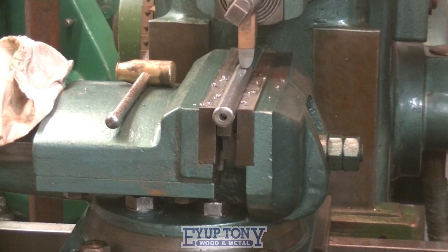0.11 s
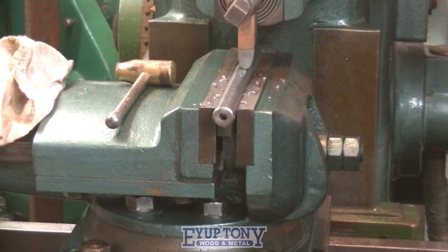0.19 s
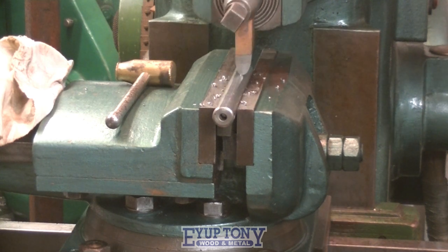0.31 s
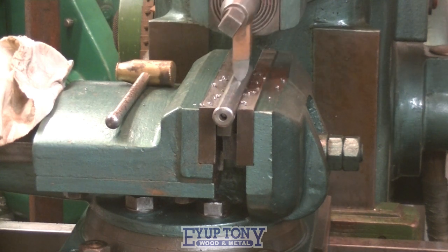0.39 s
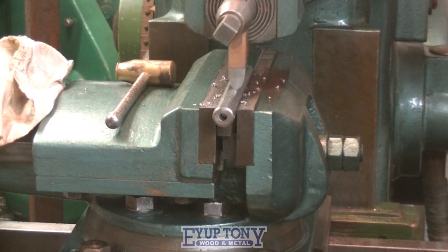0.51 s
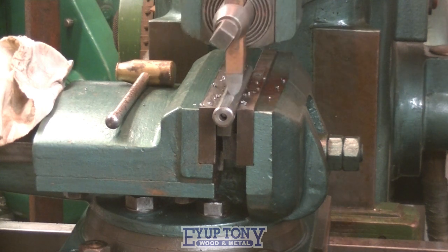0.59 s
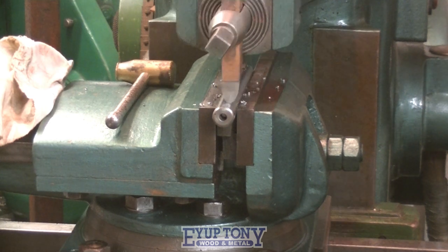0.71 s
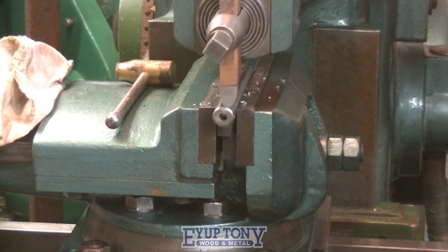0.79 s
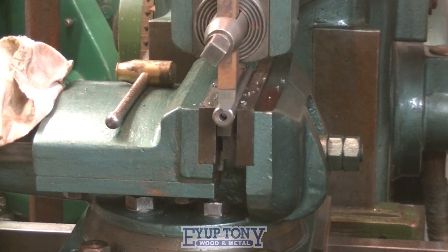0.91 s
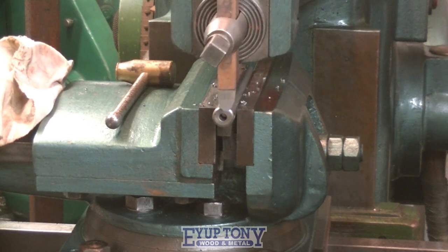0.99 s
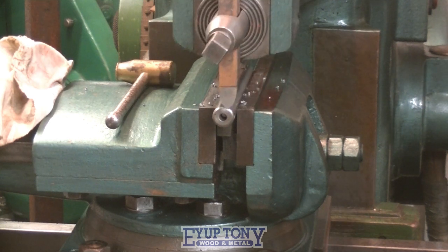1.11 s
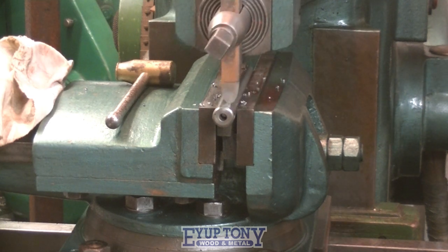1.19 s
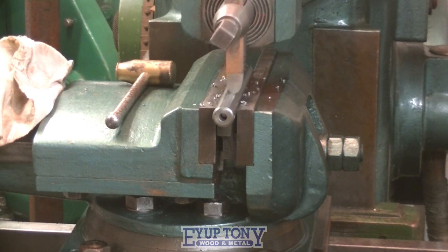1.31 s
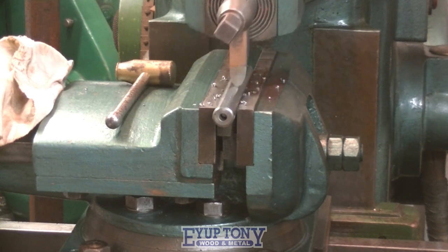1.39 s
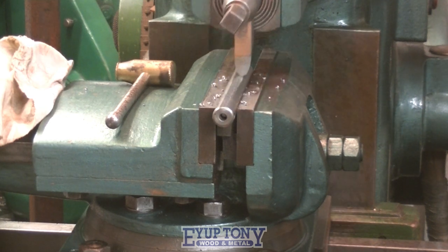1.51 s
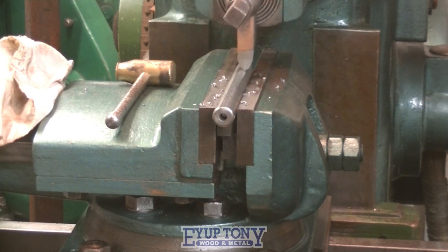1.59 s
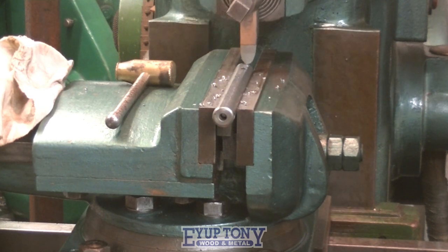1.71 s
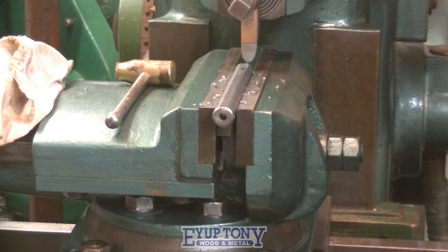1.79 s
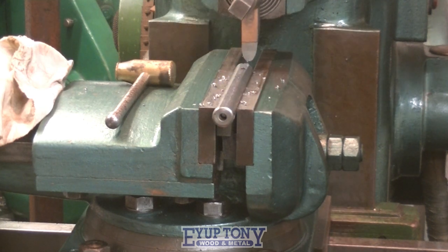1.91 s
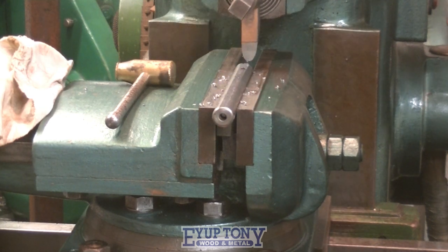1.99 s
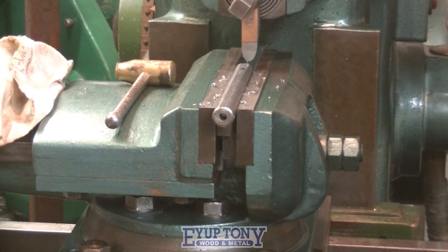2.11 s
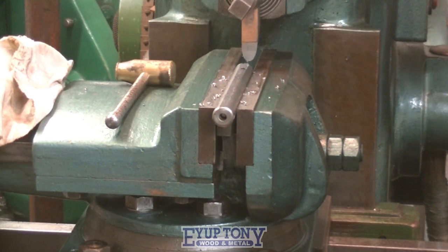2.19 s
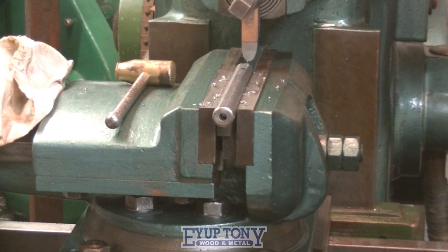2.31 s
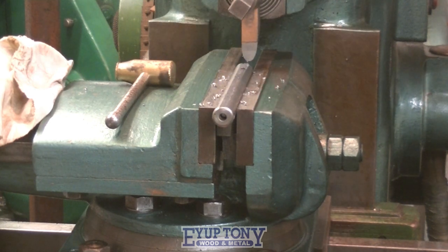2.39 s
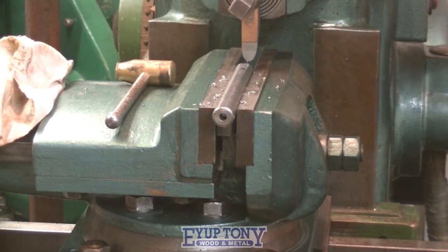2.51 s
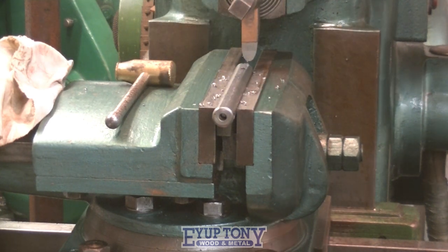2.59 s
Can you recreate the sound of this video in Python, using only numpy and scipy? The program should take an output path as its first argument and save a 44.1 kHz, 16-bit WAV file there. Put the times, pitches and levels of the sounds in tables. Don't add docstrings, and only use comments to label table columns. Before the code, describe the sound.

A metal shaper in a workshop: low motor and gear noise, then a rough ringing metal slide out and back, a sharp bright snap midway, and small linkage knocks as it stops; close stereo microphone.

```python
import sys
import numpy as np
from scipy import signal
from scipy.fft import rfft, irfft
from scipy.io import wavfile
from scipy.ndimage import uniform_filter1d

SR = 44100
rng = np.random.default_rng(int(sys.argv[2]) if len(sys.argv) > 2 else 0)


def linear_from_db(decibels):
    return 10 ** (np.asarray(decibels, float) / 20)


def dump_mix(stems):
    frames = np.atleast_2d(stems).T
    limited = np.clip(frames, -1, 1)
    pcm = np.round(limited * 32767).astype(np.int16)
    wavfile.write(sys.argv[1], SR, pcm)


N = 116865
T = np.arange(N) / SR

# (multiple of HUM_HZ, level [dB])
HUM_PARTIALS = [(1, -89), (4, -76), (5, -68), (6, -70), (7, -72), (8, -73), (9, -61), (10, -74), (11, -71)]
# (time [s], level [dB])
MOTOR_LOAD = [(0, 0), (.2, 0), (1, -3), (2.1, 2), (2.3, 1.5), (2.45, -2.5), (2.65, -11.5)]
HUM_HZ, SLOT_MULTIPLE = 99.6, 9
HUM_WAVER_DB, HUM_WANDER_CYCLES = 1.0, 0.02
LOAD_SHARE = 0.22

# (frequency [Hz], density [dB per Hz])
IDLE_COLOUR = [(15, -79), (25, -55), (221, -13.5), (495, -0.5), (741, -8), (895, -3.5), (2560, -8.5),
               (12200, -40), (15500, -80)]
# (frequency [Hz], width [Hz], level [dB])
GEAR_MODES = [(387, 30, -70), (1120, 120, -66), (2575, 110, -68), (2970, 70, -75), (4050, 90, -80),
              (4414, 70, -80), (4250, 400, -79)]
IDLE_DB, GEAR_SWAY_DB = -58.5, 1.0

# (time [s], level [dB])
TOOL_DRAG = [(0, -64), (.03, -100), (.25, -100), (.28, -72.5), (.62, -76.5), (.7, -100), (1.33, -100),
             (1.38, -70.5), (1.6, -73), (1.703, -75), (1.712, -59), (1.728, -64), (1.74, -71), (1.762, -63),
             (1.79, -74), (1.83, -100)]
# (frequency [Hz], width [Hz], level [dB])
SHANK_MODES = [(7030, 60, 0), (7220, 60, -1), (7360, 90, -9)]
# (frequency [Hz], density [dB per Hz])
CHIP_COLOUR = [(2500, -15), (4500, 7), (8400, -1), (10500, -19), (12500, -5), (14500, -11), (15500, -30)]
# (start [s], length [s], level [dB])
CHIPS = [
    (.31, 0.05, -80),
    (0.48, 0.04, -74),
    (.58, .05, -73.5),
    (1.6, .06, -78),
    (1.708, 0.022, -66),
    (1.728, 0.048, -64),
]
CHATTER_DB, CHIP_RISE_S, CHIP_FALL_S = 3.0, 0.008, 0.02

# (time [s], level [dB], brightness [dB])
RAM_EFFORT = [(.21, -54.5, -30), (0.249, -44.5, -11), (0.291, -38.5, -5), (.34, -41.5, -5), (.6, -42.5, -4),
              (.82, -43, -8), (.88, -41, -6.5), (1.01, -45.5, -7.5), (1.15, -43, -6), (1.4, -40.5, -4.5),
              (1.74, -42, -4.5), (1.8, -41.5, -4), (1.87, -43.5, -4.5), (1.92, -45, -6.5), (1.98, -45, -9),
              (2.03, -53.5, -14), (2.09, -61, -5)]
# (frequency [Hz], density [dB per Hz])
CASTING_COLOUR = [(60, -79), (200, -43.5), (330, -8.5), (1270, -2.5), (2650, -14.5), (4500, -29),
                  (8000, -37), (15000, -77)]
# (frequency [Hz], width [Hz], level [dB])
STROKE_MODES = [(350, 14, -8), (388, 34, 2.5), (598, 20, -6), (647, 14, -3), (687, 16, 0), (760, 22, 1),
                (807, 16, 0), (939, 35, 0), (1089, 25, -3), (1180, 18, -2), (1292, 16, -2), (1412, 18, -5),
                (1720, 25, -6), (1930, 35, -6),
                (142, 32, -24), (486, 32, -21), (897.5, 29, -1), (1023, 16, -2), (1233, 14, -3),
              (1480, 40, -10), (1643.5, 21, -5), (1822, 67, -0.5), (2150, 66, -10), (2554, 26, -10),
              (2814, 19, -33)]
SLIPS_PER_S, SLIP_SPREAD_DB = 4000, 2.5
MODES_DB, RAM_ROOM_DB = -0.5, -3.0
SPLIT_HZ, BRIGHT_DB = 1500, 3.5

# (frequency [Hz], density [dB per Hz])
SNAP_COLOUR = [(880, -23), (1500, -27), (2270, 2.5), (4550, -3), (5490, -4), (8400, -2), (10500, -17),
               (13100, -11), (15800, -22), (16500, -60)]
# (frequency [Hz], T60 [s])
SNAP_T60 = [(2000, 0.29), (5000, 0.28), (8000, .21), (14000, .17)]
# (frequency [Hz], lead of left [rad])
SNAP_PHASE = [(3500, 0), (5200, .6), (6500, -1.2), (7400, -.1), (9000, -1.6), (9800, 4), (16000, 5.5)]
SNAP_S, SNAP_DB, THUD_DB, RAGGED_DB = 1.1928, -50.5, -71, 0.8
HOLD_S, HOLD_LIFT = 0.006, 1.3
CRACK_DB, CRACK_S, CRACK_HZ = -27, 0.00022, 8000

# (time [s], level [dB], centre [Hz],
# length [s], reach [octaves])
KNOCKS = [(1.774, -43, 1100, 0.04, 0.94), (1.796, -47.5, 420, 0.031, 0.24),
          (1.816, -52.5, 3600, 0.049, 0.54), (1.825, -74, 7900, .022, .06), (1.854, -63, 4130, 0.028, 0.46),
          (1.885, -42.5, 850, 0.024, 0.66), (1.945, -49.5, 940, 0.053, 0.67), (2.03, -58, 493, 0.054, 0.37),
          (2.099, -60, 2750, .014, .2), (2.11, -59, 1750, 0.063, .4), (2.139, -62, 417, 0.028, 0.31),
          (2.158, -64, 2580, 0.044, 0.078), (2.223, -60, 2580, 0.022, .15), (2.292, -69, 2550, 0.039, .1),
          (2.346, -61, 2560, 0.01, .12), (2.368, -60.5, 2660, .016, .2), (2.39, -64, 2500, .012, .15)]
# (frequency [Hz], level [dB], T60 [s])
LINKAGE_MODES = [(404, 0, .08), (700, 0, .08), (894, 0, .07), (1180, -3, .05), (1660, 0, .06),
                 (2210, -5, .05), (2590, 0, .06), (2960, -3, .06), (3550, -9, .03), (4200, -3, .03),
                 (4590, -4, .03), (5050, -6, .02), (7960, -10, .04)]
BELL_DB, RATTLE_DB = -12, 5

# (frequency [Hz], T60 [s])
ROOM_T60 = [(300, .45), (1500, .4), (6000, .25), (14000, .12)]
ROOM_DB = -10
# (frequency [Hz], left-right likeness [0-1])
LIKENESS = [(60, 0.12), (180, 0.89), (550, 1), (1650, 0.94), (4970, 0.62), (15000, 0.087)]
# (frequency [Hz], left minus right [dB])
LEAN = [(60, 1.5), (180, 1), (550, 4), (1650, 2.0), (4970, 0.5), (15000, 3)]
# (frequency [Hz], density [dB per Hz])
HISS_COLOUR = [(25, 10), (80, 2), (300, -7), (8000, 2), (12500, -22), (13500, -34)]
HISS_DB = -84


def evened(x):
    return x / np.sqrt(np.mean(x ** 2) + 1e-20)


def read(points, hz):
    f, value = np.transpose(points)
    return np.interp(np.log(hz + 1), np.log(f + 1), value)


def curve(points):
    return np.interp(T, *np.transpose(points))


def colour(x, points):
    n = x.shape[-1]
    return irfft(rfft(x) * linear_from_db(read(points, np.fft.rfftfreq(n, 1 / SR))), n)


def noise():
    return rng.standard_normal(N)


def resonate(x, hz, width_hz):
    r = np.exp(-np.pi * width_hz / SR)
    poles = [1, -2 * r * np.cos(2 * np.pi * hz / SR), r * r]
    return evened(signal.lfilter([1, 0, -1], poles, x))


def drift(seconds):
    n = max(int(seconds * SR), 1)
    return evened(uniform_filter1d(uniform_filter1d(noise(), n), n))


def spread(a, b, likeness):
    c = np.clip(read(likeness, np.fft.rfftfreq(N, 1 / SR)), 0, 1)
    right = irfft(c * rfft(a) + np.sqrt(1 - c ** 2) * rfft(b), N)
    return np.array([a, right])


def dying_noise(length_s, t60s):
    white = rng.standard_normal((2, int(length_s * SR)))
    hz, t, z = signal.stft(white, SR, nperseg=128)
    t60 = np.maximum(read(t60s, hz), 0.01)[:, None]
    return signal.istft(z * linear_from_db(-60 * t / t60), SR, nperseg=128)[1]


def room(x):
    tail = dying_noise(0.71, ROOM_T60)
    wet = signal.fftconvolve(x[None], tail / np.linalg.norm(tail[0]), axes=1)[:, :N]
    return linear_from_db(ROOM_DB) * spread(*wet, LIKENESS)


def motor():
    hum = np.zeros(N)
    for multiple, db in HUM_PARTIALS:
        share = 1 if multiple == SLOT_MULTIPLE else LOAD_SHARE
        level_db = db + share * curve(MOTOR_LOAD) + HUM_WAVER_DB * drift(0.044)
        cycles = multiple * HUM_HZ * T + rng.random() + HUM_WANDER_CYCLES * drift(0.046)
        hum += np.sqrt(2) * linear_from_db(level_db) * np.sin(2 * np.pi * cycles)
    return hum


def idle():
    ports = []
    for _ in range(2):
        port = linear_from_db(IDLE_DB) * evened(colour(noise(), IDLE_COLOUR))
        for hz, width_hz, db in GEAR_MODES:
            port += linear_from_db(db + GEAR_SWAY_DB * drift(0.031)) * resonate(noise(), hz, width_hz)
        ports.append(port)
    sway_db = LOAD_SHARE * curve(MOTOR_LOAD) + 0.61 * drift(0.024)
    return linear_from_db(sway_db) * spread(*ports, LIKENESS)


def tool():
    chatter = linear_from_db(CHATTER_DB * drift(0.0039)) * rng.standard_normal((2, N))
    squeals = []
    for c in chatter:
        rings = sum(linear_from_db(db) * resonate(c, hz, width_hz) for hz, width_hz, db in SHANK_MODES)
        squeals.append(evened(colour(rings, [(6000, -24), (6800, 5), (7500, 7), (8500, -26)])))
    squeal = linear_from_db(curve(TOOL_DRAG)) * spread(*squeals, [(5000, 0.94), (14000, 1.0)])

    scrape = np.zeros(N)
    for start_s, length_s, db in CHIPS:
        rise = np.clip((T - start_s) / CHIP_RISE_S, 0, 1)
        fall = np.exp(-np.maximum(T - start_s - length_s, 0) / CHIP_FALL_S)
        scrape += linear_from_db(db) * rise * fall
    fizz = [evened(colour(linear_from_db(0.7 * drift(0.003)) * noise(), CHIP_COLOUR)) for _ in range(2)]
    return squeal + scrape * spread(*fizz, [(5000, 0.54), (14000, 0.59)])


def ram():
    s, db, bright_db = np.transpose(RAM_EFFORT)
    effort = linear_from_db(np.interp(T, [0.18, *s, 2.3], [-90, *db, -90]) + 1.03 * drift(0.011))
    ports = []
    for _ in range(2):
        slips = (rng.random(N) < SLIPS_PER_S / SR) * rng.choice([-1, 1], N)
        slips = slips * linear_from_db(SLIP_SPREAD_DB * np.minimum(rng.exponential(1, N), 2))
        drive = effort * (evened(slips) + 0.83 * noise())
        modes = STROKE_MODES
        rings = sum(linear_from_db(d) * resonate(drive, hz, width_hz) for hz, width_hz, d in modes)
        rings = evened(colour(rings, [(100, -40), (150, -6), (3000, 3), (6000, -25)]))
        both = evened(colour(drive, CASTING_COLOUR)) + linear_from_db(MODES_DB) * rings
        low = colour(both, [(SPLIT_HZ * 0.62, 0), (SPLIT_HZ * 1.64, -30)])
        ports.append(low + (both - low) * linear_from_db(np.interp(T, s, bright_db) + BRIGHT_DB))
    direct = spread(*ports, LIKENESS) * np.sqrt(np.mean(effort ** 2)) * linear_from_db(-3.5)
    return direct + linear_from_db(RAM_ROOM_DB) * room(direct[0])


def snap():
    tail = dying_noise(0.37, SNAP_T60)
    t = np.arange(tail.shape[1]) / SR
    tail = np.array([tail[0], 0.78 * tail[0] + 0.5 * tail[1]])
    tail = tail * (1 + HOLD_LIFT * np.exp(-t / HOLD_S)) * linear_from_db(RAGGED_DB * drift(0.0016)[:len(t)])
    scatter = colour(tail, [(500, -36)] + list(SNAP_COLOUR))
    scatter = linear_from_db(SNAP_DB + 12.5) * scatter * np.minimum(t / 0.0006, 1)
    crack = linear_from_db(CRACK_DB) * np.exp(-t / CRACK_S) * np.cos(2 * np.pi * CRACK_HZ * t)
    thud = linear_from_db(THUD_DB) * np.sin(2 * np.pi * 35 * t) * np.exp(-t / 0.015)

    out, at = np.zeros((2, N)), round(SNAP_S * SR)
    out[:, at:at + len(t)] = (scatter + crack + thud) * np.clip((t[-1] - t) * 10, 0, 1)
    lag_rad = read(SNAP_PHASE, np.fft.rfftfreq(N, 1 / SR))
    out[1] = irfft(rfft(out[1]) * np.exp(-1j * lag_rad), N)
    return colour(out, [(14500, 0), (16000, -4), (16700, -40)])


def linkage():
    out, t = np.zeros(N), np.arange(SR // 4) / SR
    lead = SR // 50
    steps = np.linspace(-4, 4, 33)
    for s, db, centre_hz, length_s, reach_oct in KNOCKS:
        push = np.sin(np.pi * np.clip(t / length_s, 0, 1) ** 0.65) * rng.standard_normal(len(t))
        ring = sum(linear_from_db(d - 60 * t / t60) * np.sin(2 * np.pi * hz * t) for hz, d, t60 in LINKAGE_MODES)
        rung = evened(signal.fftconvolve(push, ring)[:len(t)])
        both = rung + linear_from_db(RATTLE_DB) * evened(push)
        bell = np.transpose([centre_hz * 2 ** (steps * reach_oct), BELL_DB * steps ** 2 / 2])
        knock = evened(colour(np.roll(both, lead), bell))
        part = out[round(s * SR) - lead:][:len(t)]
        part += (linear_from_db(db) * knock * np.sqrt(length_s / 0.25))[:len(part)]
    return out


def scene():
    knocks = linkage()
    return motor() + idle() + tool() + ram() + snap() + knocks + room(knocks)


def low_pass(x):
    return signal.sosfilt(signal.butter(12, 16470, fs=SR, output="sos"), x)


def record(dry):
    pad = SR // 8
    wide = np.pad(dry, ((0, 0), (pad, pad)), "reflect")
    left = colour(wide[0], [(hz, db / 2) for hz, db in LEAN])
    right = colour(wide[1], [(hz, -db / 2) for hz, db in LEAN])
    ports = np.array([left, right])[:, pad:pad + N]
    hiss = linear_from_db(HISS_DB) * evened(colour(rng.standard_normal((2, N)), HISS_COLOUR))
    return low_pass(ports + hiss)


dry = scene()
out = record(dry)
dump_mix(out)
```